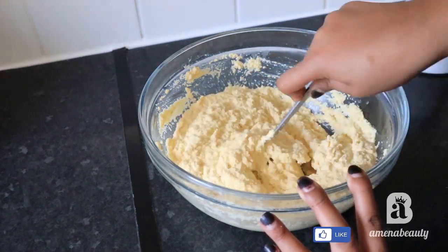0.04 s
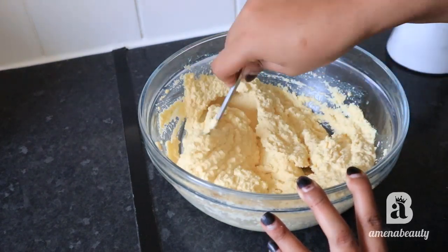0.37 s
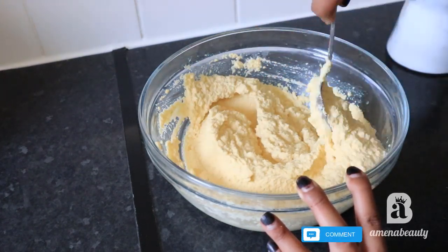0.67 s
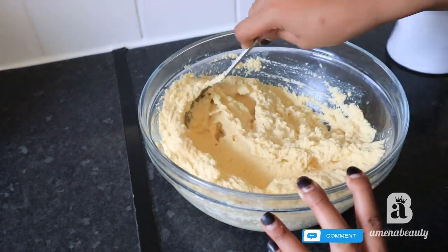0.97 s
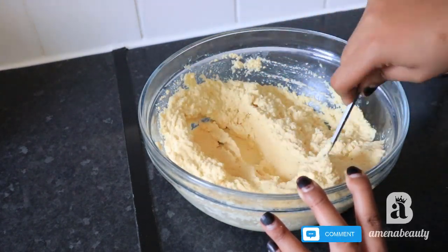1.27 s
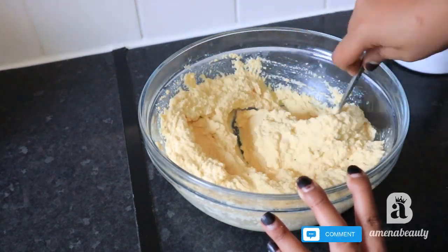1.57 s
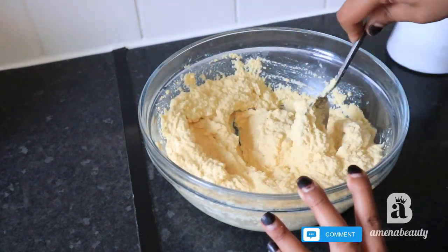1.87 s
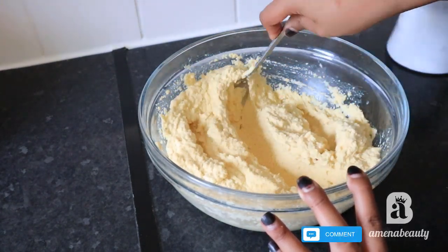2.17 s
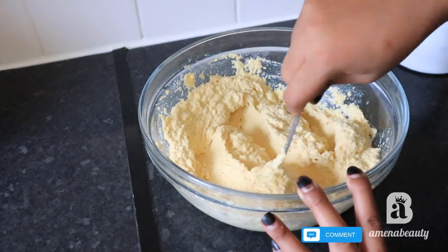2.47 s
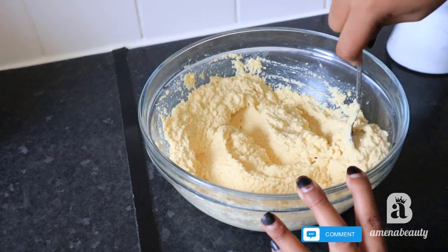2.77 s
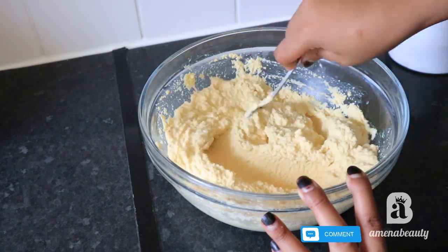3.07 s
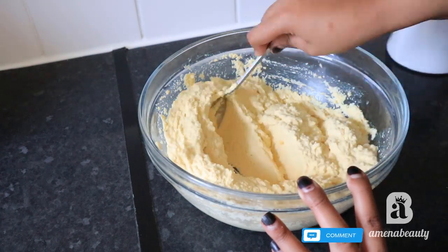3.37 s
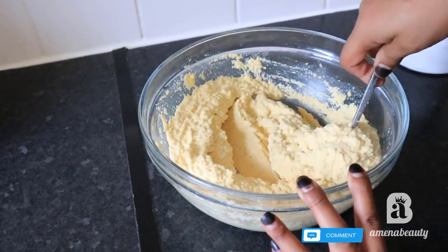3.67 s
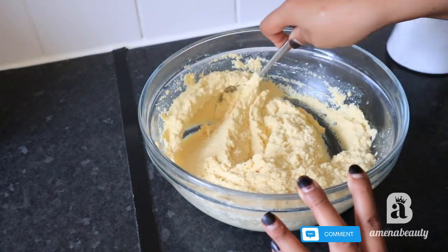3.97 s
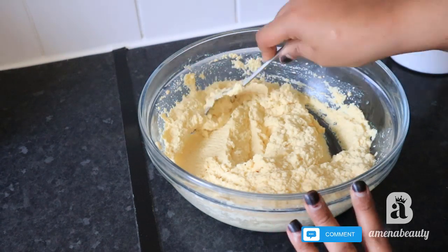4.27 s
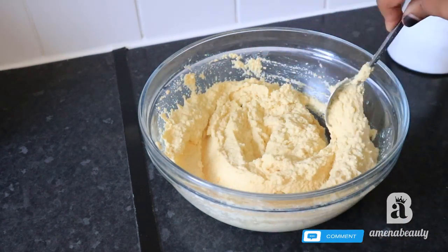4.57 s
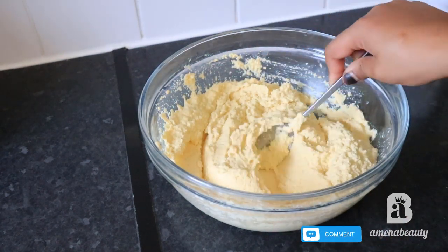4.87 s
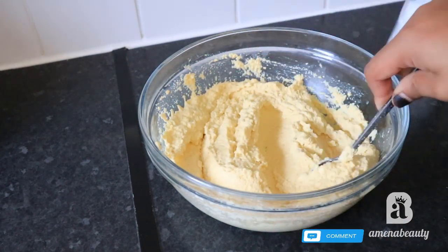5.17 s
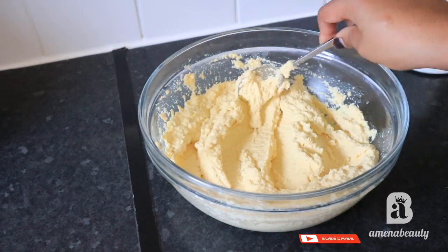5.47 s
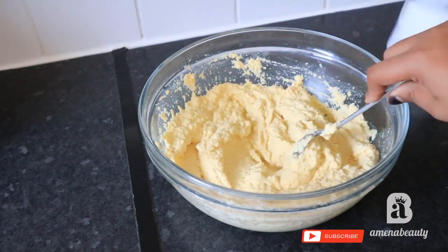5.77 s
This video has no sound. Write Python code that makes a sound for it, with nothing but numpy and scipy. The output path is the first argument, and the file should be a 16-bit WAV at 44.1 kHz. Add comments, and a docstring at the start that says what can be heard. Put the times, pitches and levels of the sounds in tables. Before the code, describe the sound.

Close, irregular knocks and occasional bright clinks of a spoon on a glass bowl, over the sticky smear of batter being mixed.

```python
"""First comes a soft, wet smear: a metal spoon pushing through thick batter in a glass bowl.
Then the spoon starts beating. Batter cushions most blows, which knock the bowl on the kitchen worktop;
four meet bare glass and ring, damped by the hand that steadies the bowl. In between, the batter
crackles, squelches and snaps. The microphone is close, and the small, hard room adds short echoes."""
import sys
import numpy as np
from scipy import signal
from scipy.fft import rfft, irfft, next_fast_len
from scipy.io import wavfile

SR = 44100
rng = np.random.default_rng(int(sys.argv[2]) if len(sys.argv) > 2 else 0)


def put_to_file(sound):
    """Save the sound as 16-bit audio at rate SR, in the file named by the first command-line argument."""
    columns = np.atleast_2d(sound).T  # one column per channel
    safe = np.clip(columns, -1, 1)
    whole_steps = np.round(safe * 32767)
    wavfile.write(sys.argv[1], SR, whole_steps.astype(np.int16))


N = 257103
TIME = np.arange(N) / SR
AFTER = TIME[:SR // 2]   # seconds since a short sound began


def from_db(db):
    return 10 ** (np.asarray(db) / 20)


def rms(x):
    return np.sqrt(np.mean(x ** 2) + 1e-20)


def dying(t60):
    """A fade that drops 60 dB in t60 seconds, the 'fade time'."""
    return from_db(-60 * AFTER / t60)


def at_hz(points, hz):
    """Reads between the rows of a table, along a musical pitch scale."""
    table_hz, values = np.transpose(points)
    return np.interp(np.log(np.maximum(hz, 1)), np.log(table_hz), values)


def band(x, edges, order=3):
    return signal.sosfilt(signal.butter(order, edges, "band", fs=SR, output="sos"), x)


def slow_noise(hz, shape):
    return signal.sosfilt(signal.butter(2, hz, fs=SR, output="sos"), rng.standard_normal(shape))


def octaves(bands, home_index):
    """How many octaves each band lies above the home band."""
    centres = np.log2(bands).mean(axis=1)
    return centres - centres[home_index]


def add(out, s, sound):
    """Mixes a sound in at s seconds."""
    start = max(round(s * SR), 0)
    out[:, start:start + sound.shape[-1]] += sound[..., :N - start]


# how alike the bowl sounds left and right: (pitch [Hz], likeness [1 = same, -1 = opposite])
LIKENESS = [(100, 1), (350, 1), (600, 0.96), (1000, 0.95), (2300, 0.85), (3200, 0.78), (4400, 0.52),
            (7500, -0.5), (10000, -0.16)]
def stereo(pair, spectrum, likeness=LIKENESS):
    """Shapes two unrelated noises into a left and a right side of average size 1."""
    size = next_fast_len(pair.shape[-1])
    hz = np.arange(size // 2 + 1) * SR / size
    mid, side = rfft(pair, size) * from_db(at_hz(spectrum, hz))
    alike = np.clip(at_hz(likeness, hz), -1, 1)
    sides = np.sqrt(1 + alike) * mid + np.sqrt(1 - alike) * side * [[1], [-1]]
    out = irfft(sides, size)[:, :pair.shape[-1]]
    return out / rms(out)


def push(s, swell_s, ease_s, range_db=19.5):
    """One push of the spoon gains range_db over swell_s, peaks at s and loses it again over ease_s."""
    distance = np.maximum((s - TIME) / swell_s, (TIME - s) / ease_s)
    return from_db(-range_db * np.minimum(distance, 10))


# the batter's low churn, middle smear and high crackle: (low edge [Hz], high edge [Hz])
STIR_BANDS = [(150, 700), (700, 3000), (3000, 12000)]
# their balance in a plain stroke: (churn [dB], smear [dB], crackle [dB])
STIR_BALANCE = [-0.6, 1.1, -6.5]
# spoon strokes: (peak time [s], swell [s], easing [s], relative level [dB], brightness [dB per octave])
STROKES = [(0.004, 0.13, 0.2, -35, 0.5), (0.555, .33, 0.078, -38.5, -0.5), (1.038, 0.057, .13, -32.5, 0.5),
           (1.6, 0.085, 0.16, -45.5, 1), (2.18, .1, 0.27, -48, -1), (2.42, .2, 0.25, -49, 1),
           (3.17, 0.051, 0.075, -30.5, 2.5), (3.34, .06, 0.22, -42, 2.5), (3.635, 0.066, 0.6, -43, 0.5),
           (3.835, 0.31, 0.092, -38.5, -1.5), (4.29, 0.041, .05, -48.5, -4), (4.56, 0.26, 0.33, -45.5, 1.5),
           (4.69, 0.24, 0.62, -49.5, 0.5), (5.229, 0.16, 0.19, -49, 1), (5.76, 0.087, 0.094, -54.5, 2)]
def stirring(idle_db=-61.5, drag_db=-29.5, drag_swell_s=0.025, drag_ease_s=0.25):
    """Loudness of each batter band: the spoon never quite rests, drags after knocks and makes strokes."""
    power = from_db(idle_db) ** 2
    for s, db, *_ in KNOCKS:   # listed above knocks()
        power += (from_db(db + drag_db) * push(s + drag_swell_s, drag_swell_s, drag_ease_s)) ** 2
    above = octaves(STIR_BANDS, home_index=1)[:, None]
    for s, swell_s, ease_s, db, bright_db in STROKES:
        power = power + (from_db(db + bright_db * above) * push(s, swell_s, ease_s)) ** 2
    return from_db(STIR_BALANCE)[:, None] * np.sqrt(power)


def sticking(lump_db=1.5, lump_hz=70):
    """The batter clings and gives way in lumps, so its loudness is uneven."""
    lumps = slow_noise(lump_hz, N + SR)[SR:]
    gain = from_db(lump_db * np.clip(lumps / rms(lumps), -2, 2))
    return gain / rms(gain)


def bubbles(per_s=1300, size_db=2.5, cycles=11, rise=.15, pitches=24):
    """Bursting air bubbles ring for a moment, their pitch rising as they open."""
    sizes = from_db(size_db * np.minimum(rng.exponential(1, N), 3)) * rng.choice([-1, 1], N)
    bursts = sizes * (rng.random(N) < per_s / SR)
    which_pitch = rng.integers(0, pitches, N)
    out = np.zeros(N)
    for k, hz in enumerate(np.geomspace(350, 3200, pitches)):
        age = np.arange(int(cycles / hz * SR)) * hz / (cycles * SR)   # 0 to 1 over the bubble's life
        chirp = from_db(-60 * age) * np.sin(2 * np.pi * cycles * age * (1 + rise * age))
        out += signal.oaconvolve(bursts * (which_pitch == k), chirp * np.sqrt(hz))[:N]
    return out / rms(out)


# tone of wet batter: (pitch [Hz], relative level [dB])
BATTER_TONE = [(130, -9), (300, 1), (550, -0.5), (820, 0.5), (1100, 4.5), (1700, 2), (3000, -6.5),
               (5000, -12), (7000, -10.5), (11000, -19), (13000, -37.5)]
def batter(smear=0.35, tears_per_s=2000, size_db=2.7, bubble_db=-6, gain_db=-0.5):
    """Films of batter tear in uneven grains and bubbles burst over the smooth smear of the spoon."""
    sizes = from_db(size_db * np.minimum(rng.exponential(1, N), 3.5))
    grains = rng.standard_normal((2, N)) * (smear + sizes * (rng.random(N) < tears_per_s / SR))
    pops = from_db(bubble_db) * bubbles() * np.array([[1], [0]])   # midway between left and right
    texture = stereo(grains / rms(grains) + pops, BATTER_TONE)
    parts = [band(texture, edges) for edges in STIR_BANDS]
    stirred = sum(gain * part / rms(part) for gain, part in zip(stirring(), parts))
    return from_db(gain_db) * sticking() * stirred


# tone of the kitchen air: (pitch [Hz], relative level [dB])
AIR_TONE = [(15, -38), (25, -13), (87, -5.5), (195, -11), (317, -8.5), (344, -9.5), (575, -13), (1480, -16),
            (1940, -16), (5430, -24.5), (7310, -31.5), (12200, -31), (16000, -58)]
# how alike the air sounds left and right: (pitch [Hz], likeness [-1 to 1])
AIR_LIKENESS = [(50, 0.96), (110, 1), (250, .1), (1000, -0.72), (10000, -0.37)]
def kitchen_air(level_db=-50.5):
    """The air makes a faint, steady hush all around."""
    return from_db(level_db) * stereo(rng.standard_normal((2, N)), AIR_TONE, AIR_LIKENESS)


# short tones of the full bowl, spoon and worktop: (pitch [Hz], relative level [dB], fade time [s])
BODY_TONES = [(154.2, -1.5, 0.087), (229.5, -9, 0.12), (296.6, -8.5, .1), (354.7, -6, 0.065),
              (419, -10, 0.22), (502.4, -3, 0.047), (597.6, -3, 0.047), (731, -13.5, 0.11),
              (1050, 1.5, 0.032), (1179, -4, 0.06), (1426, -5, 0.034), (1587, -3.5, 0.048),
              (2096, -8.5, 0.013), (3285, -9.5, 0.048), (3876, -2.5, 0.024), (4340, -10.5, 0.045),
              (6370, -4.5, 0.04), (7470, -4.5, 0.041), (8070, -11.5, 0.035), (9800, -6.5, 0.035),
              (10430, -14.5, 0.021)]
def body_tones(scatter_db=2):
    """Bowl, spoon and worktop shake; shifting batter retunes them each time, the high tones most."""
    hz, db, t60 = np.transpose(BODY_TONES)
    give = np.interp(hz, [600, 1200], [.01, .06])
    detuned_hz = hz * (1 + give * rng.standard_normal(len(hz)))
    tones = dying(t60[:, None]) * np.sin(2 * np.pi * np.outer(detuned_hz, AFTER))
    strengths = from_db(db + rng.normal(0, scatter_db, len(hz))) * rng.choice([-1, 1], len(hz))
    return strengths @ tones


# a blow's bands, from thump up to treble: (low edge [Hz], high edge [Hz])
BLOW_BANDS = [(115, 300), (300, 800), (800, 2000), (2000, 5000), (5000, 13000)]
def blow_levels(db, slope_db, thump_db, favoured_hz, lift_db):
    """Level of each band: harder contact gives more treble, and the band that resonates is lifted."""
    upper = BLOW_BANDS[1:]
    favoured = np.array([low <= favoured_hz < high for low, high in upper])
    return [thump_db, *(db + slope_db * octaves(upper, home_index=0) + lift_db * favoured)]


# many brief tones that blur into noise: (pitch [Hz], relative level [dB])
CLATTER_TONE = [(100, 13), (400, -2), (700, 7), (860, -3), (1100, 0), (2800, -1.5), (4600, -4),
                (5400, -8.5), (6600, 0.5), (8100, -6), (8900, -14), (10800, -11.5), (12300, -15),
                (16000, -29)]
def blow(levels_db, crack_t60, hollow=0, crack_db=7, clatter_db=-5, clatter_t60=0.093, attack_s=0.019):
    """The spoon hits the bowl: a hard crack, a short clatter and quickly fading tones."""
    tones = body_tones()
    noise = stereo(rng.standard_normal((2, len(AFTER))), CLATTER_TONE)
    fade = from_db(crack_db) * dying(crack_t60) + from_db(clatter_db) * dying(clatter_t60)
    hit = tones + hollow + noise * fade
    parts = [band(hit, edges) for edges in BLOW_BANDS]
    return sum(from_db(db) * part / rms(part[:, AFTER < attack_s]) for db, part in zip(levels_db, parts))


def fading_tone(hz, db, t60):
    return from_db(db) * dying(t60) * np.sin(2 * np.pi * hz * AFTER)


# blows softened by batter:
# (time [s], strength [dB], treble loss [dB per octave], worktop thump [dB], pitch of the hollow [Hz])
KNOCKS = [(0.088, -57, 4.7, -35, 328), (0.167, -43.5, 3, -45, 1530), (0.342, -35.5, 3.5, -34, 562),
          (0.565, -40, 5.3, -38.5, 495), (0.9264, -28.5, 1.5, -34, 655), (1.048, -26.5, 2.5, -27.5, 597),
          (1.1864, -18, 1.5, -25, 1203), (1.382, -21.5, 2, -26, 522), (1.455, -36.5, 3, -40, 530),
          (1.62, -16, 1.76, -22.5, 968), (1.675, -26, 3, -37.5, 1060), (2.202, -41, 1.8, -29, 223),
          (2.339, -38.5, 6, -35.5, 662), (2.4577, -19, 1.58, -29.5, 1050), (3.128, -24, 1.05, -29, 590),
          (3.1987, -25.5, 3, -27, 647), (3.3905, -30.5, 6.5, -24.5, 393), (3.8406, -27.5, 4, -68.5, 1200),
          (3.99, -31, 5.5, -35, 532), (4.3025, -23, 4.5, -23.5, 510), (4.3965, -19, 2.1, -22.5, 703)]
def knocks(gain_db=0.5):
    """A cushioned blow knocks the bowl on the worktop; the hollow under the spoon adds two tones."""
    out = np.zeros((2, N))
    for s, strength_db, cushion_db, thump_db, hz in KNOCKS:
        hollow = fading_tone(hz, db=4, t60=0.043) + fading_tone(hz * .42, db=1, t60=0.04)
        levels_db = blow_levels(strength_db, -cushion_db, thump_db, hz, lift_db=3)
        add(out, s, from_db(gain_db) * blow(levels_db, crack_t60=0.019, hollow=hollow))
    return out


# air pockets behind the spoon: (time [s], length [s], start pitch [Hz], end pitch [Hz], level [dB])
SQUELCHES = [(0.452, 0.028, 423, 340, -28), (0.498, 0.016, 358, 330, -30.5), (.563, 0.014, 480, 600, -43),
             (3.625, 0.042, 967, 1116, -37), (3.703, .028, 1085, 950, -28), (3.757, 0.009, 1002, 1010, -25),
             (3.761, 0.047, 337, 322, -33), (3.809, 0.039, 318, 376, -25), (3.835, 0.033, 573, 634, -22)]
def squelches(roughness=0.27, flutter_hz=160):
    """An air pocket rings unevenly as it opens, its pitch sliding with its size."""
    out = np.zeros((2, N))
    for s, length, start_hz, end_hz, db in SQUELCHES:
        progress = np.clip(AFTER / length, 0, 1)
        phase = 2 * np.pi * np.cumsum(start_hz + (end_hz - start_hz) * progress) / SR
        flutter = slow_noise(flutter_hz, (2, len(AFTER)))
        tremble, wobble = roughness * flutter / rms(flutter)
        swell = np.sqrt(np.abs(np.sin(np.pi * progress)))
        add(out, s, from_db(db) * swell * (1 + tremble) * np.sin(phase + wobble))
    return out


# blows on bare glass: (time [s], strength [dB], treble gain [dB per octave], thump [dB], pitch of the
# struck spot [Hz], share of the full ring time [0 to 1], then ring level [dB] at each of RING_ZONES_HZ)
CLINKS = [(0.8367, -22, 2.2, -21, 425, 0.89, -27, -23, -19.5, -26.5, -20.5),
          (2.0366, -22.5, 2.1, -23, 425, 0.88, -32, -31, -28, -40, -39),
          (2.8548, -21, 1.7, -22.5, 425, 0.79, -30.5, -26.5, -18, -31, -30.5),
          (4.8189, -23, 3.9, -28.5, 1050, 0.91, -30, -21.5, -19, -20.5, -20.5)]
def clinks(gain_db=-3):
    """With no batter in the way, the spoon hits with a shorter, brighter crack."""
    out = np.zeros((2, N))
    for s, strength_db, hardness_db, thump_db, spot_hz, *_ in CLINKS:
        levels_db = blow_levels(strength_db, hardness_db, thump_db, spot_hz, lift_db=7)
        add(out, s, from_db(gain_db) * blow(levels_db, crack_t60=0.009))
    return out


def wavering(rate_hz):
    """A random wobble, as complex numbers so that it bends both loudness and pitch."""
    slow = slow_noise(rate_hz, (2, 2 * len(AFTER)))[:, len(AFTER):]
    return (slow[0] + 1j * slow[1]) / rms(slow) / np.sqrt(2)


# where each clink sets the strength of its ring: (pitch [Hz])
RING_ZONES_HZ = [1049, 1893, 2932, 4131, 5471]
# tones of the glass wall: (pitch [Hz], relative level [dB], fade time [s], first swing over ring [dB])
GLASS_TONES = [(425, 0, .26, 6), (1049, -1, .33, 3), (1893, -1, .46, 4), (2932, 0, .3, 12),
               (4131, -8, .42, 0), (5471, 0, .27, 7), (6191, -11, .18, 6), (6907, -7, .22, 3),
               (6995, -6, .33, 3), (7400, -10, .3, 3), (7885, -7, .3, 3), (8608, -7, .24, 6),
               (9765, -11, .27, 6), (11140, -13, .2, 6)]
def glass_ring(gain_db=-1, waver_hz=36, grip_t60=0.032, attack_s=0.11):
    """The glass rings, wavering as spoon and batter shift; fingers soon soak up the first loud swing."""
    out = np.zeros((2, N))
    for s, _, _, _, _, ring_share, *zone_db in CLINKS:
        for hz, db, t60, swing_db in GLASS_TONES:
            side_phase = np.arccos(np.clip(at_hz(LIKENESS, hz), -1, 1)) * np.array([[.5], [-.5]])
            lasting = (1 + wavering(waver_hz)) * dying(t60 * ring_share)
            first_swing = from_db(swing_db) * dying(grip_t60)
            ring = np.imag((lasting + first_swing) * np.exp(1j * (2 * np.pi * hz * AFTER + side_phase)))
            level_db = gain_db + db + np.interp(hz, RING_ZONES_HZ, zone_db)
            add(out, s, from_db(level_db) * rng.choice([-1, 1]) * ring / rms(ring[:, AFTER < attack_s]))
    return out


# small sticky snaps: (time [s], rough pitch [Hz], relative level [dB])
SNAPS = [(1.591, 3000, -48.5), (2.403, 3960, -45), (3.1039, 3480, -47), (3.591, 1700, -39),
         (3.73, 2700, -35), (3.9724, 2840, -40.5), (4.142, 3130, -34), (5.0956, 4190, -44.5),
         (5.222, 2600, -37.5), (5.249, 2930, -37), (5.7524, 3410, -44)]
def snaps(t60=0.022, gain_db=6):
    """A strand of batter lets go of the glass with a tiny tick."""
    out = np.zeros((2, N))
    for s, hz, db in SNAPS:
        tick = band(rng.standard_normal(len(AFTER)) * dying(t60), [hz / 1.63, hz * 1.12], order=2)
        add(out, s, from_db(db + gain_db) * tick / np.abs(tick).max())
    return out


# how long the kitchen echoes: (pitch [Hz], fade time [s])
ECHO_FADES = [(120, 0.24), (400, 0.32), (1200, 0.267), (4000, 0.3962), (8000, 0.2662), (13000, 0.29)]
# how loudly it echoes: (pitch [Hz], level against the sound sent in [dB])
ECHO_LEVELS = [(120, -5), (400, -3.5), (1200, -2), (4000, -1.5), (10000, -3)]
def echo_pattern(first_echo_s=.002, build_s=0.0048):
    """Tiles and worktop answer almost at once; the echoes blur into a tail that fades band by band."""
    echoes = stereo(rng.standard_normal((2, len(AFTER))), spectrum=[(1, 0), (SR, 0)])   # even in tone
    onset = 1 - np.exp(-np.maximum(AFTER - first_echo_s, 0) / build_s)
    edges = np.geomspace(60, 17000, num=9)
    pattern = 0
    for low, high in zip(edges, edges[1:]):
        hz = np.sqrt(low * high)
        tail = band(echoes, [low, high]) * onset * dying(at_hz(ECHO_FADES, hz))
        band_share = np.sqrt(2 * (high - low) / SR / len(AFTER))
        pattern += from_db(at_hz(ECHO_LEVELS, hz)) * band_share * tail / rms(tail)
    return pattern


def kitchen_echoes(sound, changes=12):
    """The spoon travels round the bowl, so one pattern of echoes keeps fading into the next."""
    out = np.zeros((2, N))
    step = TIME[-1] / changes
    for centre in np.arange(changes + 1) * step:
        near = np.abs(TIME - centre) < step
        share = np.cos(np.pi / 2 * (TIME[near] - centre) / step)
        add(out, TIME[near][0], signal.fftconvolve(sound[:, near] * share, echo_pattern(), axes=-1))
    return out


def scene():
    """Bowl and batter close by, the kitchen around them."""
    blows = knocks() + clinks()
    ring = glass_ring()
    mixture = batter() + squelches()
    ticks = snaps()
    into_room = blows + from_db(-11) * ring + from_db(-3) * mixture + from_db(-8) * ticks
    return blows + ring + mixture + ticks + kitchen_echoes(into_room) + kitchen_air()


# how well the microphone hears each pitch: (pitch [Hz], gain [dB])
MICROPHONE = [(30, -1), (75, -1), (125, 0.5), (1000, -1), (10500, 1.5), (11700, 2), (12600, -10.5),
              (14000, -14), (16000, -17)]
def record(dry, cutoff_hz=17000):
    """The microphone dulls the highest treble, peaks that overload it are clipped, and the top is cut."""
    size = next_fast_len(N + SR // 10)
    hz = np.arange(size // 2 + 1) * SR / size
    heard = irfft(rfft(dry, size) * from_db(at_hz(MICROPHONE, hz)), size)[:, :N]
    top_cut = signal.cheby2(14, 70, cutoff_hz, fs=SR, output="sos")
    return signal.sosfilt(top_cut, np.clip(heard, -1, 1))


dry = scene()
out = record(dry)
put_to_file(out)
```